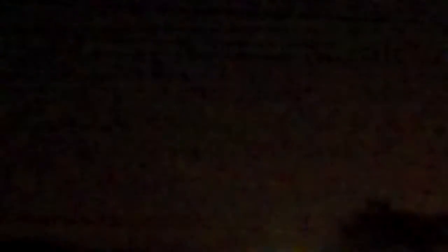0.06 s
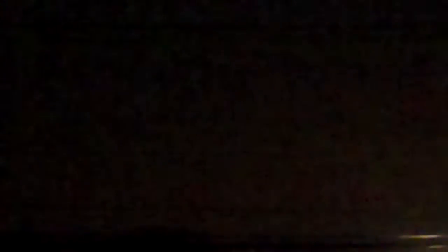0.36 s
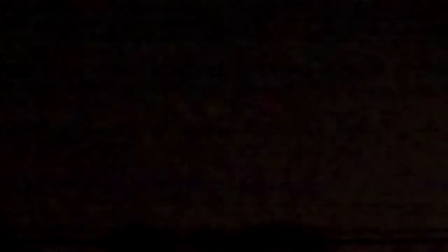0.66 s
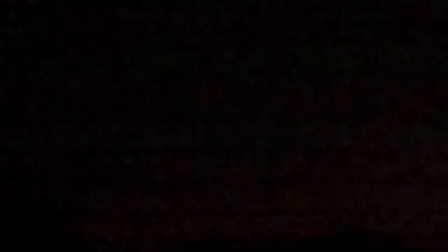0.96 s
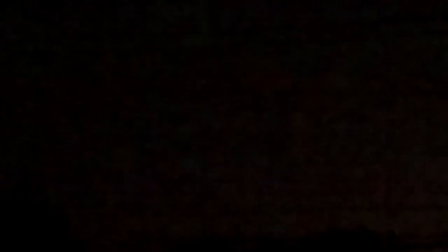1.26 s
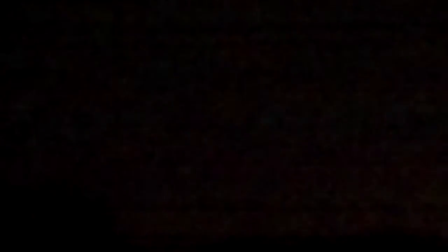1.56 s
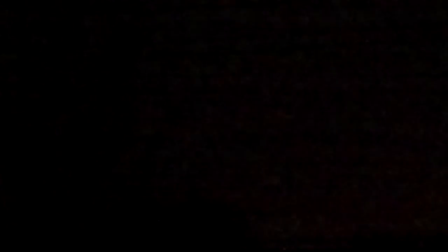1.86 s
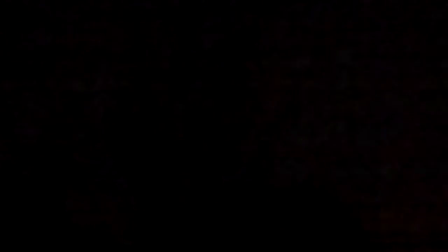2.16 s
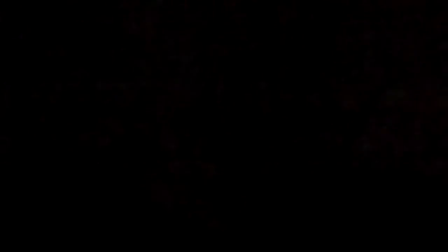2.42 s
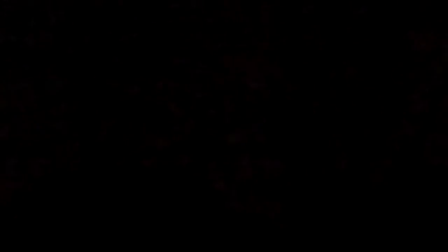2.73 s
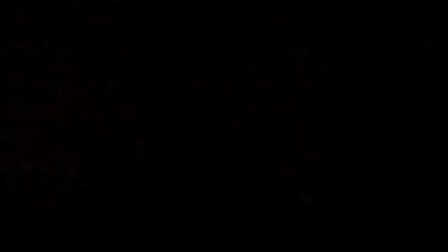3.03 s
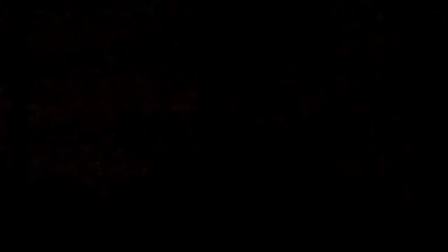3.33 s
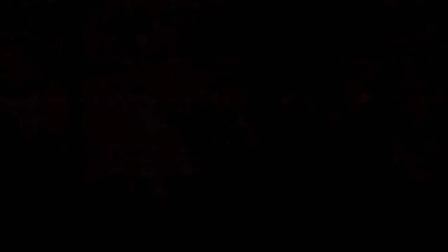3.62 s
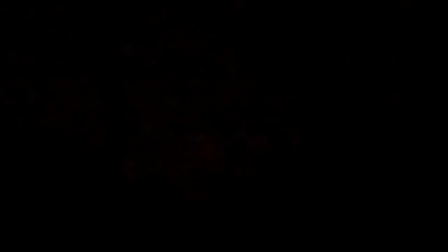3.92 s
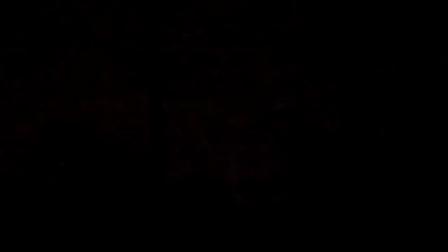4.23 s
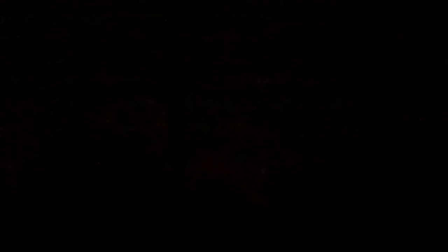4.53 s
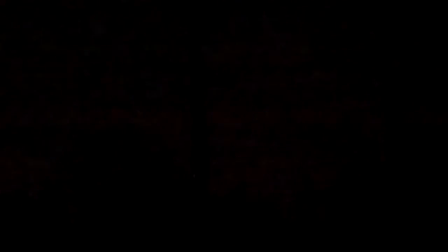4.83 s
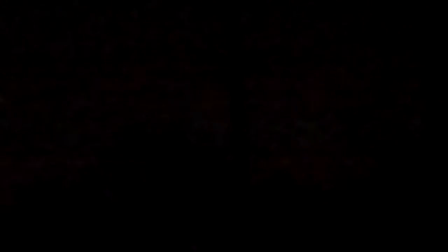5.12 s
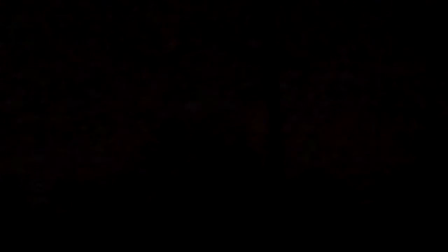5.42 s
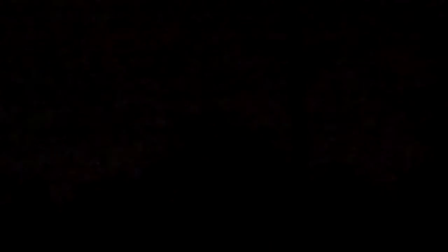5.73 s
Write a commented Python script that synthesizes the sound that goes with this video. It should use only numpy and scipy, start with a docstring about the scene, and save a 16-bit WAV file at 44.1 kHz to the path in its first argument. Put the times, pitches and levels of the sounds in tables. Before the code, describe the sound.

Rain patters and drips on hard ground until a loud clap of thunder breaks and rumbles off.

```python
"""A thunderclap over steady night rain. A faint mutter runs ahead; then shocks from the kinked
lightning channel break in two volleys and roll away between walls. Close by, drips smack and splash
on hard ground and drops patter; far drops merge into a wash and a hiss. The two microphone ports
ring at different pitches, and a limiter ducks the rain at the loudest crack."""
import sys
import numpy as np
from scipy import signal
from scipy.fft import rfft, irfft
from scipy.io import wavfile
from scipy.ndimage import uniform_filter1d, minimum_filter1d

SR = 44100
rng = np.random.default_rng(int(sys.argv[2]) if len(sys.argv) > 2 else 0)


def inscribe(sig):
    """Save sig as 16-bit PCM at rate SR to the path in sys.argv[1].

    A 1-D sig is mono; a 2-D sig holds one channel per row.
    Samples are clipped to [-1, 1] before scaling.
    """
    pcm = np.round(np.clip(np.atleast_2d(sig).T, -1, 1) * 32767)
    wavfile.write(sys.argv[1], SR, pcm.astype(np.int16))


N = 254898
TIME_S, FREQ_HZ = np.arange(N) / SR, np.fft.rfftfreq(N, 1 / SR)


# Resonances between the walls: f/Hz, width/Hz, lift/dB
YARD_MODES = [(113, 14, 2.5), (136.5, 30, 4.5), (160, 14, -3), (191.2, 18, 6), (230, 16, 0), (256, 34, 3),
              (342, 16, -3.5), (377, 19, 3), (489, 22, 4.5), (720, 17, 4), (794, 35, 5.5), (1026, 34, 6),
              (1120, 8.3, 2.5)]
def rumble(spectrum, per_s, side_db, steady_s):
    """Shocks from the many kinks of the lightning channel overlap and ring in the yard."""
    middle, side = colour(impacts(per_s, spread_db=1.3), spectrum, YARD_MODES)
    power = uniform_filter1d(middle ** 2, int(steady_s * SR))
    power = uniform_filter1d(power, SR // 50)
    middle = middle / np.sqrt(abs(power) + 1e-9)  # level evens out, grain stays
    return widen(middle, side, side_db)


# Strongest shocks: t/s, peak level/dB, air cutoff f/Hz
SHOCKS = [(4.373, -25, 330), (4.493, -9.5, 450), (4.544, -3.5, 560), (4.589, -10, 450), (4.611, -0.5, 1070),
          (4.616, 5, 530), (4.696, -10, 650), (4.865, -5, 860), (4.907, -9.5, 650), (4.922, -7.5, 403),
          (4.933, -6, 900), (5.159, -15, 378), (5.492, -21, 160)]
# Yard response to a shock: f/Hz, level/dB
SHOCK_SPECTRUM = [(20, -28), (50, -18), (85, -4), (200, -1), (330, 2), (500, -4.5), (800, -2.5),
                  (1500, -11.5), (3000, -8.5), (8000, -55)]
def thunder_cracks(push_cycles=0.47):
    """Each strong shock is a push and a longer suction, dulled by air and thrown back by walls."""
    dry, t = np.zeros((2, N)), TIME_S[:SR // 20]
    yard = impulse_response(SHOCK_SPECTRUM, YARD_MODES)
    for start_s, peak_db, cutoff_hz in SHOCKS:
        age = t * cutoff_hz / push_cycles  # duller shocks push longer
        wave = signal.fftconvolve((1 - age) * np.exp(-age), yard)
        wave = signal.lfilter(*signal.butter(3, cutoff_hz, fs=SR), wave)
        add(dry, start_s, amp(peak_db) * wave / abs(wave).max())
    middle, side = echoes(dry, t60_s=0.44, gap_s=0.0034, per_s=1500)
    return dry + amp(-3.5) * widen(middle, side, side_db=-24)


# Low boom and sharper tearing: f/Hz, level/dB
BOOM_SPECTRUM = [(15, -34), (40, -14), (55, -16), (70, -7), (110, -5.5), (190, -1.5), (320, 0), (450, -5.5),
                 (650, -14.5), (1000, -33), (1800, -34), (3000, -75)]
TEAR_SPECTRUM = [(100, -39), (400, -0.5), (780, -0.5), (1050, -8), (1300, -11.5), (1600, -20.5),
                 (2000, -31), (2600, -45), (5000, -79)]
# Stretches of channel heard all at once: t/s, hold/s, boom level/dB, tear level/dB
VOLLEYS = [(4.434, 0.023, -17, -50), (4.519, 0.07, -15.5, -21.5), (4.591, 0.047, -13, -22.5),
           (4.872, .025, -18, -21.5), (5.114, .01, -30, -42), (5.44, 0.043, -34, -56)]
def thunder_clap(start_s=4.363, roll_hold_s=0.46):
    """A long roll holds while the channel's sound keeps arriving; volleys add their power to it."""
    booms = [amp(-23) * envelope(start_s, attack_s=0.069, hold_s=roll_hold_s, fall_db_per_s=17)]
    tears = [amp(-29.5) * envelope(start_s, attack_s=0.19, hold_s=roll_hold_s, fall_db_per_s=17.5)]
    for at_s, hold_s, boom_db, tear_db in VOLLEYS:
        booms.append(amp(boom_db) * envelope(at_s, attack_s=0.039, hold_s=hold_s, fall_db_per_s=229))
        tears.append(amp(tear_db) * envelope(at_s, attack_s=0.039, hold_s=hold_s, fall_db_per_s=101))
    boom = rumble(BOOM_SPECTRUM, per_s=700, side_db=-25, steady_s=0.021)
    tear = rumble(TEAR_SPECTRUM, per_s=900, side_db=-12.5, steady_s=0.017)
    return boom * np.linalg.norm(booms, axis=0) + tear * np.linalg.norm(tears, axis=0)


# Far-branch thunder: f/Hz, level/dB
MUTTER_SPECTRUM = [(40, -30), (130, -4), (260, 2.5), (420, 0), (750, -6.5), (1200, -18.5), (2500, -44)]
# Mutters: t/s, hold/s, level/dB
MUTTERS = [(3.5, 0.13, -57), (3.813, 0.21, -51), (4.123, .11, -44)]
def thunder_mutter():
    """Far branches rumble faintly ahead of the clap."""
    gain = sum(amp(level_db) * envelope(start_s, attack_s=0.036, hold_s=hold_s, fall_db_per_s=90)
               for start_s, hold_s, level_db in MUTTERS)
    return rumble(MUTTER_SPECTRUM, per_s=500, side_db=-22.5, steady_s=0.1) * gain


# Trailing swell: f/Hz, level/dB
SWELL_SPECTRUM = [(15, -34), (45, -14), (70, 1), (105, 6), (150, -11), (300, -10), (1000, -55)]
def thunder_swell(start_s=4.9, rise_s=0.37):
    """A deep rumble arrives last, from the far end of the channel."""
    gain = amp(-40) * np.clip((TIME_S - start_s) / rise_s, 0, 1)
    return rumble(SWELL_SPECTRUM, per_s=300, side_db=-22, steady_s=0.081) * gain


def small_drips(per_s=4, smack_db=-40, splat_db=-48, low_hz=2950, high_hz=7500, mean_t60_s=0.18):
    """Lesser drips of random time, pitch and decay, as rows like BIG_DRIPS."""
    draws = rng.random((round(per_s * N / SR), 3))
    return [(when * N / SR, smack_db, splat_db, low_hz * (high_hz / low_hz) ** pitch,
             mean_t60_s * (0.5 + length)) for when, pitch, length in draws]


# Big drips: t/s, smack level/dB, splat level/dB, splat f/Hz, t60/s
BIG_DRIPS = [(.255, -46.5, -46.5, 3850, .3), (.7028, -37, -42.5, 3350, .14), (.932, -37, -44.5, 7500, .3),
             (.964, -42, -45, 3400, 0.13), (1.021, -31, -34, 7360, 0.046), (1.218, -44, -46, 7640, 0.14),
             (1.547, -40, -50, 3900, 0.091), (1.703, -35, -36.5, 7050, 0.15), (2.1, -33, -46, 7100, .08),
             (2.204, -36, -47, 4000, .25), (2.352, -42, -40.5, 8800, 0.39), (2.362, -35.5, -43, 5200, 0.37),
             (2.4331, -34, -42, 3000, .1), (2.5605, -30, -48, 5300, .085), (2.591, -35, -45, 3970, .11),
             (2.6946, -28, -48, 7200, .09), (2.81, -44, -50, 3220, 0.35), (3.08, -41, -42.5, 9450, .38),
             (3.175, -44, -39.5, 9300, .18), (3.193, -30.5, -46, 4300, 0.14), (3.346, -40, -38, 5200, 0.21),
             (3.606, -38, -38.5, 5840, 0.19), (3.88, -37, -45, 3420, 0.068), (4.015, -35, -49, 3480, 0.08),
             (4.177, -39, -40, 6370, .22), (4.472, -37, -42.5, 2660, 0.12), (4.519, -29.5, -41, 5000, .16),
             (4.552, -32, -41.5, 6900, 0.19), (4.676, -40, -41.5, 4300, 0.12),
             (4.736, -45, -44.5, 6400, .4), (4.9612, -36, -44, 6600, 0.25), (5.0, -44, -45, 3900, 0.28),
             (5.066, -45, -45, 5950, 0.27), (5.35, -48, -46, 3920, 0.36), (5.3923, -31, -42.5, 7250, .16)]
# Smack and fine spray: f/Hz, level/dB
SPRAY_SPECTRUM = [(800, -29), (2000, -1.5), (3500, 5.5), (5500, 5.5), (7200, 11), (10000, -1), (14000, -2)]
def drips(smack_decay_s=0.0009, spray_re_splat_db=-4):
    """A drip smacks the ground, splats at its own pitch and throws a fading spray."""
    fine, splats, t = np.zeros((2, N)), np.zeros((2, N)), TIME_S[:SR // 3]
    droplets = impacts(per_s=7000, spread_db=2)
    for start_s, smack_db, splat_db, splat_hz, t60_s in BIG_DRIPS + small_drips():
        splat_gain = amp(splat_db - 60 * t / t60_s)
        lag_s = rng.uniform(-0.00009, 0.00009)  # each lands in its own place
        smack = amp(smack_db) * np.exp(-t / smack_decay_s) * rng.standard_normal((2, len(t)))
        thrown = np.roll(droplets, -round(start_s * SR), axis=1)[:, :len(t)]
        spray = amp(spray_re_splat_db) * splat_gain * thrown
        splat = bandpass(rng.standard_normal((2, len(t))), splat_hz * 0.82, splat_hz * 1.144)
        add(fine, start_s, from_side(smack + spray, lag_s, likeness=0.81))
        add(splats, start_s, from_side(splat_gain * unit_rms(splat), lag_s, likeness=0.84))
    dry = colour(fine, SPRAY_SPECTRUM) + splats
    return dry + amp(-11) * echoes(dry, t60_s=0.42, gap_s=0.0032, per_s=3100)


# Near droplets: f/Hz, level/dB
PATTER_SPECTRUM = [(500, -17.5), (1500, -6), (2800, -3.5), (5000, -0.5), (7000, 1.5), (10000, -3),
                   (14000, -8)]
# Slow surges: t/s, level/dB
PATTER_LEVELS = [(0, -46), (1.0, -46.5), (1.9, -46.5), (2.3, -47), (2.76, -48), (2.84, -44), (3.3, -46.5),
                 (3.55, -44), (3.7, -47), (4.64, -45.7), (4.76, -49.5), (5.1, -45), (5.5, -47),
                 (5.63, -45.5), (5.78, -47)]
def patter(band_drops_per_s=45, clump_decay_s=0.0054, flutter_db=0.9):
    """Near drops burst into clumps of droplets, each clump in its own band."""
    dry, edges_hz = np.zeros((2, N)), np.geomspace(1500, 14000, num=8)
    for low_hz, high_hz in zip(edges_hz, edges_hz[1:]):
        drops = (rng.random(N) < band_drops_per_s / SR) * rng.uniform(0.28, 1, N)
        clumps = signal.lfilter([1], [1, -np.exp(-1 / (clump_decay_s * SR))], drops)
        droplets = impacts(per_s=5000, spread_db=2.9) * unit_rms(np.sqrt(0.33 + clumps))
        dry += bandpass(droplets, low_hz, high_hz)
    ticks = amp(-15) * impacts(per_s=82, spread_db=4.1)
    dry = from_side(colour(dry + ticks, PATTER_SPECTRUM), lag_s=0, likeness=0.1)
    wet = dry + amp(-8.5) * echoes(dry, t60_s=0.17, gap_s=0.003, per_s=3000)
    return unit_rms(wet) * amp(over_time(PATTER_LEVELS) + flutter_db * wander(rate_hz=11))


# Far wash and hiss: f/Hz, level/dB
WASH_SPECTRUM = [(20, -24), (50, -6.5), (80, -6), (130, 0.5), (300, -2.5), (600, -2), (950, -3),
                 (1150, -5.5), (2000, -16.5), (5000, -26), (14000, -42)]
HISS_SPECTRUM = [(300, -19.5), (700, -9), (930, 2), (1200, -1.5), (1800, 1), (2800, -1), (4500, -8.5),
                 (8000, -17.5), (14000, -14.5)]
# Fading hiss: t/s, level/dB
HISS_LEVELS = [(0, -44), (.7, -45), (1.0, -48.5), (1.7, -49), (3.2, -53), (5.78, -58)]
def far_rain(wash_db=-51.5, wander_db=0.5, left_lag_s=0.00006):
    """Countless far drops merge into a wash; a grainy hiss comes from the right."""
    wash = colour(rng.standard_normal((2, N)), WASH_SPECTRUM)
    wash *= amp(wash_db + wander_db * wander(rate_hz=5.5))
    hiss = colour(impacts(per_s=9000, spread_db=2.6), HISS_SPECTRUM)
    hiss *= amp(over_time(HISS_LEVELS) + wander_db * wander(rate_hz=8.5))
    left, right = diffuse(hiss)
    return diffuse(wash) + np.array([np.roll(left, round(left_lag_s * SR)), right])


# Far rain between the ports: f/Hz, likeness/0-1
PORT_LIKENESS = [(35, .6), (70, 0.9), (130, 1), (300, 0.96), (630, 0.9), (1370, 0.7), (2200, 0.32),
                 (3200, 0), (14000, 0)]
def diffuse(x):
    """Long waves reach both ports alike, short ones do not."""
    shared, separate = rfft(x)
    likeness = np.clip(over_frequency(PORT_LIKENESS, FREQ_HZ), 0, 1)
    right = likeness * shared + np.sqrt(1 - likeness ** 2) * separate
    return irfft(np.array([shared, right]), N)


def from_side(x, lag_s, likeness):
    """A near sound reaches the left port with a lag set by its direction, only partly alike."""
    left = likeness * np.roll(x[1], round(lag_s * SR)) + np.sqrt(1 - likeness ** 2) * x[0]
    return np.array([left, x[1]])


def widen(middle, side, side_db):
    """Thunder's long waves differ only slightly between the ports."""
    return middle + amp(side_db) * np.array([side, -side])


def echoes(x, t60_s, gap_s, per_s):
    """Sparse, decaying reflections from ground and walls."""
    t = TIME_S[:SR]
    taps = rng.standard_normal((2, SR)) * (rng.random((2, SR)) < per_s / SR)
    taps *= (t > gap_s) * amp(-60 * t / t60_s)
    taps /= np.linalg.norm(taps, axis=1, keepdims=True)
    return signal.fftconvolve(x, taps, axes=1)[:, :N]


def impacts(per_s, spread_db):
    """Random clicks in two channels: many small, a few large."""
    shape = (2, N)
    size = amp(spread_db * np.minimum(rng.exponential(1, shape), 4))
    return unit_rms(size * rng.choice([-1, 1], shape) * (rng.random(shape) < per_s / SR))


def impulse_response(spectrum, modes=(), size=8192):
    """Minimum-phase response of a spectrum with added resonances."""
    hz = abs(np.fft.fftfreq(size, 1 / SR))
    modes_db = sum(lift_db / (1 + (2 * (hz - mode_hz) / width_hz) ** 2)
                   for mode_hz, width_hz, lift_db in modes)
    log_gain = np.log(amp(over_frequency(spectrum, hz) + modes_db))
    return np.fft.ifft(np.exp(np.conj(signal.hilbert(log_gain)))).real[:size // 2]


def colour(x, spectrum, modes=()):
    """Filter that keeps the power of a white input."""
    response = impulse_response(spectrum, modes)
    return signal.oaconvolve(x, response[None] / np.linalg.norm(response), axes=1)[:, :N]


def bandpass(x, low_hz, high_hz):
    return signal.sosfilt(signal.butter(2, [low_hz, high_hz], "band", fs=SR, output="sos"), x)


def envelope(start_s, attack_s, hold_s, fall_db_per_s):
    t = TIME_S - start_s
    return np.clip(t / attack_s, 0, 1) * amp(-fall_db_per_s * np.maximum(t - attack_s - hold_s, 0))


def wander(rate_hz):
    """Slow random drift, unit RMS."""
    return unit_rms(irfft(rfft(rng.standard_normal(N)) / (1 + (FREQ_HZ / rate_hz) ** 4), N))


def over_frequency(rows, hz):
    row_hz, values = np.transpose(rows)
    return np.interp(np.log(hz + 1), np.log(row_hz + 1), values)


def over_time(rows):
    return np.interp(TIME_S, *np.transpose(rows))


def add(mix, start_s, sound):
    part = mix[..., round(start_s * SR):][..., :sound.shape[-1]]
    part += sound[..., :part.shape[-1]]


def amp(db):
    return 10 ** (np.asarray(db) / 20)


def unit_rms(x):
    return x / np.sqrt(np.mean(x ** 2) + 1e-20)


def limiter(x, recovery_db_per_s=90):
    """Ducks peaks over full scale, holds about 50 ms, then recovers at a steady rate."""
    over_db = np.maximum(20 * np.log10(abs(x).max(0) + 1e-9), 0)
    half_hold = SR // 40
    held_db = -minimum_filter1d(-over_db, 2 * half_hold + 1, origin=half_hold - SR // 1000)
    recovery_db = recovery_db_per_s * TIME_S
    duck_db = np.maximum.accumulate(held_db + recovery_db) - recovery_db
    return x / amp(uniform_filter1d(duck_db, SR // 500))


def scene():
    """Thunder over rain, in stereo."""
    rain = far_rain() + patter() + drips()
    return thunder_mutter() + thunder_clap() + thunder_swell() + thunder_cracks() + rain


# Microphone port responses: f/Hz, level/dB
LEFT_PORT = [(30, -4), (200, 0.5), (2000, 0.5), (4300, 0.5), (5800, 0.5), (6500, 4), (7150, 8.5), (7900, 1),
             (9000, -6), (10500, -8.5), (14000, -10)]
RIGHT_PORT = [(30, 0), (200, 0.7), (2000, 1.42), (4300, 1.5), (5500, 2.5), (6200, -0.5), (7000, -6),
              (7900, -11.5), (9000, -12), (11300, -16.5), (14000, -11.5)]
def record(dry):
    """Port resonances, peak limiter, band limit."""
    ported = np.array([signal.oaconvolve(channel, impulse_response(port))[:N]
                       for channel, port in zip(dry, (LEFT_PORT, RIGHT_PORT))])
    lowpass = signal.firwin(511, cutoff=14230, window=("kaiser", 9), fs=SR)
    return signal.oaconvolve(limiter(ported), lowpass[None], "same")


dry = scene()
out = record(dry)
inscribe(out)
```